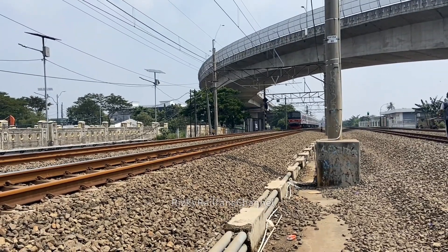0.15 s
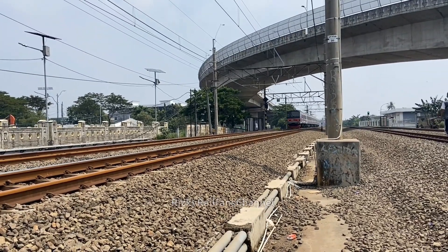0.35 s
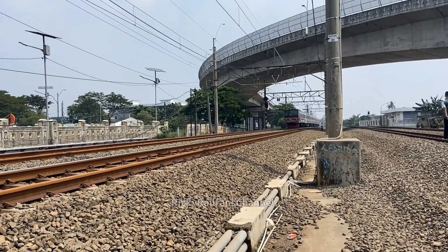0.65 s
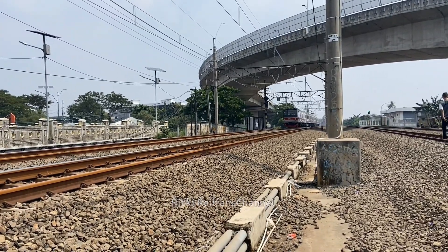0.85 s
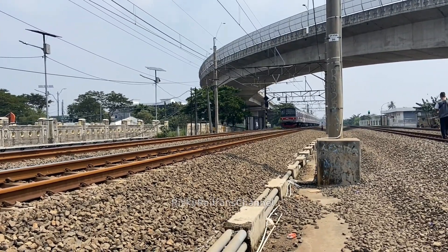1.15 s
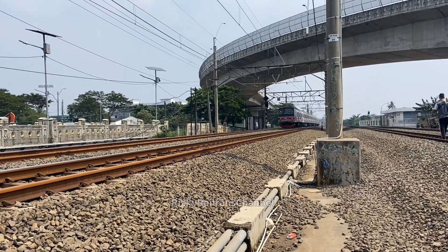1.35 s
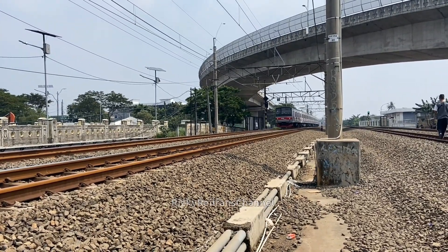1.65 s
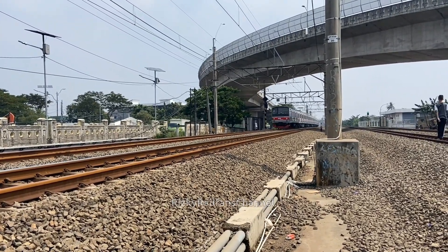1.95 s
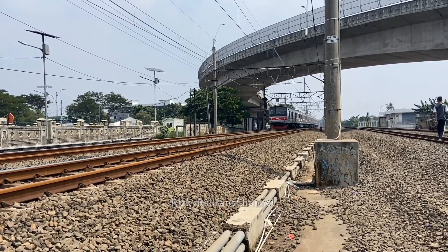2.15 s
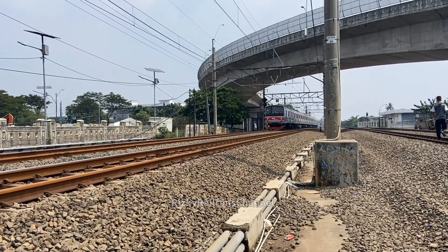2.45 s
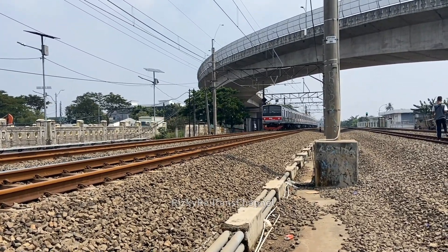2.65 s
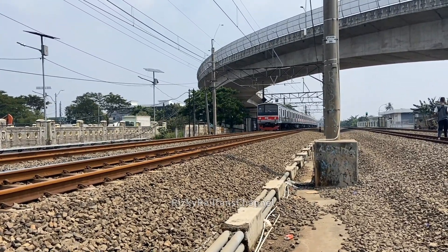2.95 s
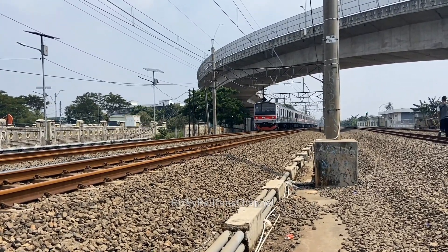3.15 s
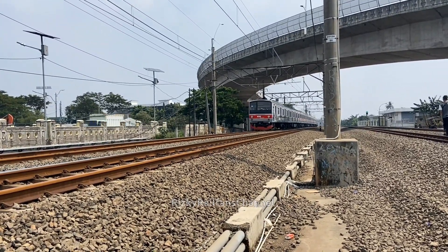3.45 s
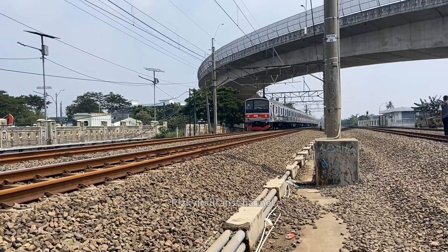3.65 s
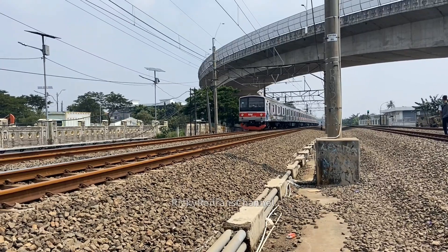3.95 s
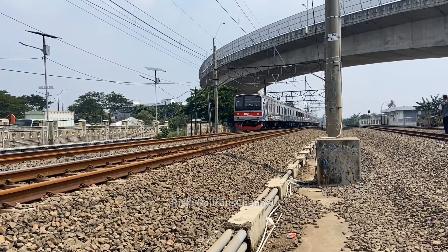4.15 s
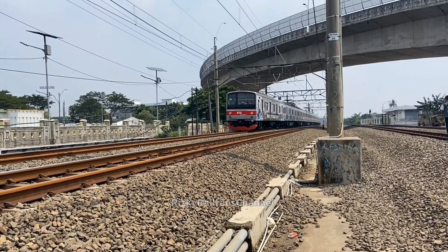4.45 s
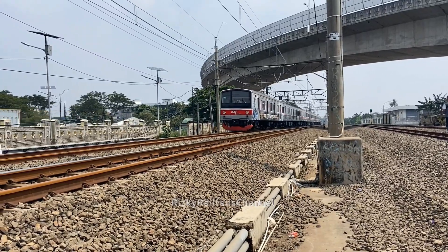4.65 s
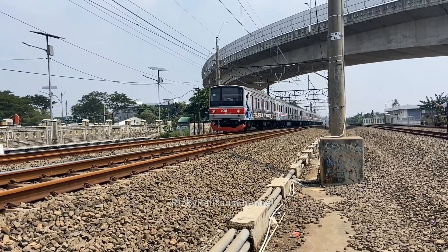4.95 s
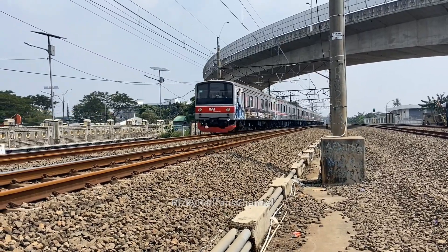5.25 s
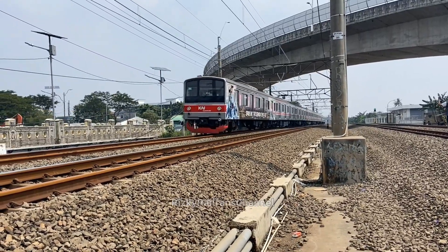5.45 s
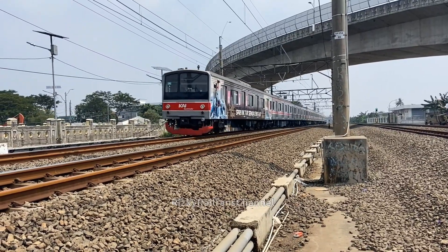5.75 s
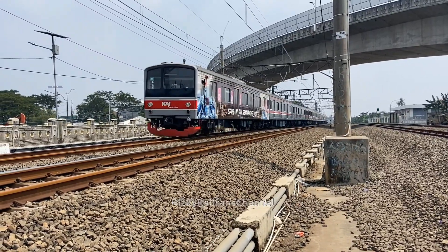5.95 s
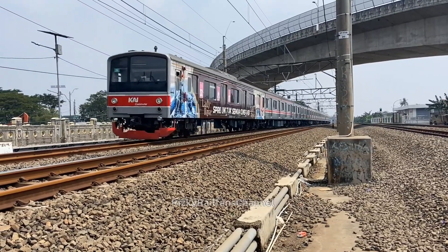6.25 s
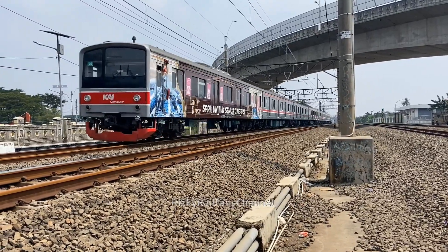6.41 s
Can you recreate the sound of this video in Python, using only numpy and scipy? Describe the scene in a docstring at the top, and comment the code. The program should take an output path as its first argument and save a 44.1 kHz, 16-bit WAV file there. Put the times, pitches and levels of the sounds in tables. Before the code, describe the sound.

Open air by the tracks under a road viaduct, heard on a stereo phone. From 0 s a deep hum around 80 Hz throbs unevenly, with wavering low motor tones, soft ground rumble and dull town noise. Thin tyre noise fades away within the first second, along with tiny high ticks and faint chirps. Light wind brushes the microphones, strongest near 1.8 s, and is mostly gone after 2.5 s. Meanwhile steel rolling slowly rises as an electric train approaches. At about 2.5 s a quick cluster of light metallic clacks rings with a short hiss; another, with a heavy thud, comes at 3.8 s while the wheels sing around it. Clacks follow at 4.4, 4.6, 5.3 and 5.6 s, then crowd together from 5.8 to 6.5 s, with more thuds. A faint mid-pitched drone appears near 5 s. The rolling is loudest at the 6.6 s cut, the train still approaching.

```python
"""An electric train nears a listener on the ballast beside the line, under a road viaduct.
From the start: throbbing hum and motor lines (sines), rumble, town and rolling (shaped noise), wind.
Tyre noise fades in the first second; ticks (decaying sines) and faint tones come mostly early, some later.
Rolling swells and sings in the wheel modes; from 2.5 s wheels hiss, crack and ring over rail joints.
A phone with two microphone ports hears it all."""
import sys
import numpy as np
from scipy import signal
from scipy.fft import rfft, irfft
from scipy.io import wavfile

SR = 44100
rng = np.random.default_rng(int(sys.argv[2]) if len(sys.argv) > 2 else 0)


def output_pcm(signal):
    """Save a mono or channel-first signal as 16-bit PCM at the path in sys.argv[1].

    Samples are clipped to [-1, 1] before scaling.
    """
    pcm = np.clip(np.atleast_2d(signal).T, -1, 1) * 32767
    wavfile.write(sys.argv[1], SR, np.round(pcm).astype(np.int16))


N = 290178
TIME_S = np.arange(N) / SR
FREQ_HZ = np.arange(N // 2 + 1) * SR / N + 1e-3   # offset avoids log(0)

# deep hum: t/s, f/Hz, level/dB
HUM = [(0.0, 78.3, -27), (0.3, 82.2, -28), (0.5, 83.1, -25.5), (0.75, 79.4, -24.5), (1.1, 79.9, -25.5),
       (1.35, 81.3, -30.5), (1.55, 77.4, -27.5), (1.8, 77.5, -29.5), (2.2, 80.27, -26), (2.4, 80.9, -29),
       (2.55, 80.05, -23), (3.3, 79.7, -25.5), (3.65, 80.94, -27.5), (4.0, 79.5, -21.5),
       (4.5, 78.86, -26.5), (4.8, 78.03, -28.5), (5.2, 78.5, -23), (5.5, 77.75, -23), (5.85, 80.2, -24),
       (6.1, 78.7, -21), (6.58, 78.8, -23)]
# brief dips and swells of the hum: centre t/s, half length/s, change/dB
HUM_THROBS = [(0.03, 0.025, -52), (0.11, 0.051, -19), (0.56, 0.064, -23), (0.93, 0.12, -12.5),
              (1.69, 0.1, -30), (2.03, 0.15, -16), (3.45, 0.026, -8), (3.75, 0.061, -4), (3.85, 0.041, -16),
              (3.96, 0.047, 5), (4.01, 0.021, -7), (4.13, 0.028, -7), (4.19, 0.025, -1), (4.3, 0.033, -7),
              (4.35, 0.03, 5), (4.43, 0.028, -5), (4.65, 0.038, -13), (4.73, 0.058, -19),
              (5.22, 0.039, -16), (5.3, 0.052, -27), (5.83, 0.02, -17), (5.96, 0.088, -50),
              (6.31, 0.038, -7), (6.45, 0.064, -35), (6.58, 0.03, -23)]
HUM_WAVER_HZ, HUM_FLUTTER_DB = 0.92, 0.5

# distant motor: t/s, speed/(turns/s), level/dB of the 4th, 5th and 6th multiples
MOTOR = [(0.0, 40.3, -60, -60, -44), (0.4, 40.3, -60, -52, -48), (0.62, 40.2, -60, -52, -46),
         (0.7, 40.0, -60, -36, -38), (0.8, 40.0, -60, -36, -36), (0.87, 40.2, -60, -50, -36),
         (0.95, 40.1, -60, -37, -34), (1.06, 40.1, -60, -38, -35), (1.14, 40.1, -42, -52, -34),
         (1.27, 40.0, -33, -60, -34), (1.45, 40.2, -46, -60, -38), (1.68, 40.4, -36, -50, -48),
         (1.85, 40.6, -50, -60, -46), (2.05, 41.0, -56, -60, -39), (2.25, 41.1, -41, -60, -41),
         (2.45, 41.2, -40, -60, -52), (2.65, 41.4, -42, -60, -54), (2.85, 41.7, -39, -60, -39),
         (3.15, 41.7, -42, -55, -40), (3.35, 41.7, -55, -42, -48), (3.55, 41.8, -60, -41, -42),
         (3.78, 41.9, -60, -39, -50), (3.88, 41.9, -60, -55, -39), (4.0, 41.9, -60, -60, -40),
         (4.1, 42.0, -60, -60, -35), (4.5, 42.0, -60, -55, -39), (4.8, 42.1, -60, -40, -42),
         (4.95, 42.1, -60, -55, -50), (5.22, 42.2, -60, -35, -37), (5.45, 42.4, -60, -46, -37),
         (5.8, 42.0, -60, -44, -43), (5.95, 41.0, -60, -39, -52), (6.3, 40.6, -60, -39, -50),
         (6.47, 40.0, -60, -38, -32), (6.58, 40.0, -60, -40, -33)]

# noise spectra, here and below, are relative: f/Hz, density/(dB per Hz)
# ground rumble from viaduct and track: f/Hz, density/(dB per Hz)
RUMBLE_COLOUR = [(20, -30), (32, -20), (45, 8), (65, 3.5), (100, 2), (150, -10), (250, -15), (400, -35)]
# brief rumble swells and dips: centre t/s, half length/s, change/dB
RUMBLE_SWELLS = [(0.2, 0.52, 7), (0.49, 0.048, 14), (0.72, 0.16, 7), (2.3, 0.61, -2.5), (3.05, 0.17, 8),
                 (3.25, 0.076, 7), (3.82, 0.05, 11.5), (4.19, 0.049, 9), (4.99, 0.11, -6),
                 (5.31, 0.068, 6.5), (5.64, 0.091, -13), (6.14, .08, 5.5), (6.36, 0.058, 4.5)]
RUMBLE_DB, RUMBLE_FOLLOWS, RUMBLE_LUMPS_DB = -29, 0.74, 2   # FOLLOWS: share of approach gain in dB

# town noise with the far roar of the train: f/Hz, density/(dB per Hz)
TOWN_COLOUR = [(40, -12), (90, -3.5), (180, 0.5), (300, -7.5), (410, -7.5), (600, -15), (1000, -16.5),
               (2000, -22.5), (3300, -29), (4300, -32.5), (5500, -34.5), (7000, -49.5), (10000, -48.5),
               (14000, -88), (17000, -68)]
TOWN_DB, TOWN_FOLLOWS = -30, 0.44

# tyre noise: t/s, level/dB
TYRES = [(0, -40), (0.15, -45), (0.3, -44.5), (0.45, -45), (0.55, -57), (0.7, -69), (1.2, -80)]
# tyre spectrum: f/Hz, density/(dB per Hz)
TYRE_COLOUR = [(600, -19), (900, 4.5), (1500, -0.5), (2000, -7), (2200, -5), (2360, 0.5), (2520, -3),
               (2750, -2), (2950, 0.5), (3200, -1.5), (3600, -10), (4300, -6), (4800, -13), (6000, -19),
               (9000, -28)]

# rolling steel on steel: f/Hz, density/(dB per Hz)
ROLLING_COLOUR = [(150, -35), (300, 4), (450, 2.5), (700, -5.5), (1100, -24.5), (2000, -21), (3500, -28.5),
                  (5500, -24.5), (8000, -26.5), (11000, -33), (17000, -39.5)]
# wheel resonances: f/Hz, width/Hz, gain/dB before song gain, singing and swell
WHEEL_MODES = [(917, 89, 9), (1560, 68, 15), (2062, 40, 12.5), (2192, 80, 12), (2394, 120, 2),
               (2842, 55, 13), (2932, 70, 13.5), (3545, 50, 9), (3750, 130, 8), (4150, 90, 2),
               (4755, 90, 4.5)]
# modes within 6 % of f briefly swell or dip: f/Hz, centre t/s, half length/s, change/dB
SINGING = [(1570, 2.7, 0.41, 7), (1570, 3.864, 0.88, 9.5), (1570, 5.21, 0.31, 6), (1570, 6.03, .06, 5),
           (1570, 6.25, 0.068, 8.5), (1570, 6.47, 0.071, 5.5), (2174, 3.73, 0.2, 6), (2162, 5.3, 0.28, 8),
           (2215, 5.97, .08, 2), (2250, 6.45, 0.098, 3), (2200, 5.72, 0.1, -1), (2900, 5.95, 0.21, 2.5),
           (2900, 6.8, 0.069, 2), (2900, 6.5, 0.046, -4), (3700, 6.3, .35, 1.5)]
START_M, SPEED_M_PER_S, REFERENCE_M = 114, 15, 30
ROLLING_DB, SPREAD_DB_PER_DECADE = -37.5, 17   # rolling level at REFERENCE_M
SONG_DB, SONG_FOLLOWS, SONG_SWELL_DB = 2.5, 0.25, 2.5

# wind on the ports: t/s, level/dB of the part in opposition
WIND = [(0, -49), (0.6, -45), (0.9, -49.5), (1.68, -44), (1.78, -38.5), (1.9, -42.5), (2.15, -44),
        (2.5, -51), (6.58, -75)]
# wind spectrum: f/Hz, density/(dB per Hz)
WIND_COLOUR = [(250, -9), (400, -6.5), (520, -1.5), (700, -0.5), (900, -6), (1500, -23)]

# tyre tones, chirps, low motor tones, a drone: start t/s, end t/s, first f/Hz, last f/Hz,
# level/dB, left minus right/dB
FAINT_TONES = [(0.035, 0.085, 2930, 2950, -53, 0), (0.15, 0.25, 2330, 2370, -55, 0),
               (0.275, 0.31, 4280, 4240, -57, 0), (0.345, 0.38, 4150, 4270, -63, -2),
               (0.395, 0.41, 4080, 4110, -58, 0), (0.422, 0.438, 4070, 4080, -57, -1),
               (0.46, 0.5, 4200, 4290, -59, 0), (0.58, 0.66, 855, 870, -52, 0),
               (0.61, 0.71, 785, 780, -52, 0), (0.73, 0.82, 121, 122, -33, 0),
               (0.79, 0.99, 822, 812, -50, 4), (0.91, 1.05, 119, 119, -35, 0), (1.4, 1.5, 188, 186, -36, 0),
               (3.1, 3.4, 168, 176, -38, 6), (4.93, 5.29, 745, 737, -44, -2),
               (5.15, 6.583, 46.92, 46.92, -38, 3), (5.402, 5.9, 385, 385, -48, -4)]
TONE_FADE_SHARE = 0.25   # of its length, centred on start and end

# tiny high ticks: t/s, peak/dB before envelope, f/Hz
TICKS = [(0.180, -47, 14000), (0.259, -54, 14600), (0.269, -45, 14100), (0.380, -48, 14100),
         (0.412, -51, 14100), (0.422, -48, 14000), (0.431, -48, 14200), (3.475, -48, 11800)]
TICK_T60_S = 0.014

# wheels over rail joints: t/s, hiss/dB, ring/dB, hardness/(dB per octave re 1 kHz), thud/dB,
# favoured mode f/Hz, hiss t60/s; levels before envelopes, ring also before mode offsets
JOINTS = [(2.544, -60, -39, -4, -40, 845, .1), (2.553, -44, -32, 0, -36, 1590, 0.24),
          (2.606, -46, -33, -5, -40, 985, .1), (3.773, -45.5, -36, -2, -30, 1590, 0.45),
          (3.784, -55, -37, 0, -40, 985, .1), (3.797, -60, -38, -2, -9, 1460, .1),
          (4.35, -44, -40, 4, -14, 845, 0.14), (4.575, -43, -40, -6, -38, 651, 0.11),
          (5.27, -53, -47, -2, -24, 400, 0.12), (5.56, -43, -50, -4, -34, 400, 0.16),
          (5.795, -40, -41, -4, -12, 985, .15), (6.034, -57, -42, 0, -34, 1590, .12),
          (6.238, -50, -42, 2, -33, 1590, 0.11), (6.33, -39, -48, -4, -16, 2940, 0.24),
          (6.395, -50, -42, 2, -36, 2120, .1), (6.505, -45, -44, 4, -11, 2120, 0.2)]
# hiss spectrum at a joint: f/Hz, density/(dB per Hz)
CLACK_COLOUR = [(300, -14), (1000, -7), (1600, -23), (3000, -7), (5500, -10), (8200, -9.5), (11000, -19.5),
                (14000, -24), (17000, -50)]
# rail modes: f/Hz, offset/dB, t60/s
RAIL_MODES = [(400, 0, 0.12), (651, -5, 0.1), (845, -4, 0.07), (985, -2, 0.09), (1460, -4, .07),
              (1590, -3, 0.06), (2120, -3, 0.05), (2940, -3, .045)]
# dry crack spectrum: f/Hz, density/(dB per Hz)
CRACK_COLOUR = [(200, -10), (500, 0), (1600, -3), (3200, -9), (5000, -24)]
CLACK_RISE_S = 0.016
THUD_HZ, THUD_T60_S = 95, 0.04
CRACK_DB, CRACK_T60_S = -4, 0.07   # CRACK_DB: re ring
BLOW_RISE_S, BLOW_SPREAD_S = 0.006, 0.006   # SPREAD: full range of mode starts
FAVOUR_DB, BLOW_CHANCE_DB = 8, 2

# the two ports: f/Hz, power share common to both, right lead/rad, left minus right/dB
PORTS = [(0, .95, 0, -1.2), (260, .85, -.1, -1), (520, .55, -.5, .3), (780, .25, -.5, 1.7),
         (1040, .3, -2.3, 1.3), (1300, .05, -1.5, .2), (1560, .45, -.7, 0), (1820, .5, -3.3, -1.3),
         (2080, .75, -5, -.3), (2340, .65, -6.25, -1.4), (2600, .35, -6.95, 0), (2950, .72, -6.9, 0),
         (3400, .2, -8.2, .7), (3640, .42, -5.9, 0), (4420, .53, -6.1, -.3), (4940, .43, -7.2, -.5),
         (5460, .33, -9.7, 0), (5850, .2, -12, -1.2), (6500, .65, -12.9, 1.5), (7500, .7, -12, .3),
         (8200, .8, -10.6, .5), (8700, 1, -9.425, 0), (9600, 1, -9.425, 0), (10500, .95, -6.3, 0),
         (11700, .95, -6.2, 0), (12600, 1, -3.1416, 0), (13700, 1, -3.1416, 0), (14900, 1, 0, 0)]
LOW_CUT_HZ, STOPBAND_EDGE_HZ = 39, 16050


def from_db(db):
    """Decibels to gain."""
    return 10 ** (np.asarray(db) / 20)


def rms_one(x):
    """Scale to unit rms."""
    return x / np.sqrt(np.mean(x ** 2) + 1e-20)


def in_time(rows):
    """Each table column as a curve over all samples."""
    t_s, *columns = np.transpose(rows)
    return [np.interp(TIME_S, t_s, column) for column in columns]


def drift(corner_hz):
    """Slow chance of unit rms: noise at SR/40 through two equal one-pole low-passes."""
    step = 40
    pole = np.exp(-2 * np.pi * corner_hz * step / SR)
    noise = rng.standard_normal(N // step + 2002)
    slow = signal.lfilter([1], [1, -2 * pole, pole ** 2], noise)[2000:]   # drop the settling
    return np.interp(np.arange(N) / step, np.arange(len(slow)), rms_one(slow))


def swells(rows):
    """Sum of cosine-squared bumps in dB: centre t/s, half length/s, change/dB."""
    total_db = 0
    for t_s, half_s, change_db in rows:
        phase = np.pi / 2 * np.clip((TIME_S - t_s) / half_s, -1, 1)
        total_db = total_db + change_db * np.cos(phase) ** 2
    return total_db


def colour(points):
    """Spectral gain, interpolated over log f; -120 dB outside the table."""
    hz, db = np.transpose(points)
    return from_db(np.interp(np.log(FREQ_HZ), np.log(hz), db, left=-120, right=-120))


def field(gain):
    """Three independent noises of one colour: common to both ports, left only, right only."""
    spectra = rfft(rng.standard_normal((3, N)))
    return rms_one(irfft(spectra * gain, N))


def tone(hz, level_db, waver_hz, flutter_db):
    """A sine of given rms level whose pitch and strength wander."""
    turns = np.cumsum(hz + waver_hz * drift(3.19)) / SR + rng.random()
    gain = np.sqrt(2) * from_db(level_db + flutter_db * drift(6.1))
    return gain * np.sin(2 * np.pi * turns)


def add(out, start_s, t60_s, shape, rise_s=0.0013):
    """Add shape(age/s) in place, with linear rise and exponential decay."""
    first = round(start_s * SR)
    age_s = np.arange(min(int(1.2 * t60_s * SR), N - first)) / SR
    envelope = np.minimum(age_s / rise_s, 1) * from_db(-60 * age_s / t60_s)
    out[first:first + len(age_s)] += envelope * shape(age_s)


def struck(hz, peak_db):
    """A sine starting at zero phase at the blow."""
    return lambda age_s: from_db(peak_db) * np.sin(2 * np.pi * hz * age_s)


def nearness_db():
    """Level re reference distance as the train closes in at steady speed."""
    distance_m = START_M - SPEED_M_PER_S * TIME_S
    return -SPREAD_DB_PER_DECADE * np.log10(distance_m / REFERENCE_M)


def hum():
    """A wavering sine throbs through dips and swells."""
    hz, level_db = in_time(HUM)
    return tone(hz, level_db + swells(HUM_THROBS), HUM_WAVER_HZ, HUM_FLUTTER_DB)


def motor():
    """Sines at three multiples of the turning speed."""
    out = np.zeros(N)
    turns_per_s, *levels_db = in_time(MOTOR)
    for multiple, level_db in zip((4, 5, 6), levels_db):
        out += tone(multiple * turns_per_s, level_db, waver_hz=0.4, flutter_db=1.0)
    return out


def rumble():
    """Low noise from viaduct and track partly follows the approach, in lumps."""
    level_db = RUMBLE_DB + RUMBLE_FOLLOWS * nearness_db()
    level_db += swells(RUMBLE_SWELLS) + RUMBLE_LUMPS_DB * drift(4.5)
    return from_db(level_db) * field(colour(RUMBLE_COLOUR))


def town():
    """Town noise, with the far roar of the train growing inside it."""
    level_db = TOWN_DB + TOWN_FOLLOWS * nearness_db() + 1.1 * drift(7.9)
    return from_db(level_db) * field(colour(TOWN_COLOUR))


def tyres():
    """Tyre noise: shaped noise under a falling level."""
    level_db = in_time(TYRES)[0] + 1.5 * drift(9.5)
    return from_db(level_db) * field(colour(TYRE_COLOUR))


def wheel_modes(noise, song_db):
    """Rolling noise drives two-pole wheel resonances, each swelling on its own."""
    out = noise.copy()
    for hz, width_hz, gain_db in WHEEL_MODES:
        radius = np.exp(-np.pi * width_hz / SR)
        poles = [1, -2 * radius * np.cos(2 * np.pi * hz / SR), radius ** 2]
        edge = (1 - radius ** 2) / 2
        rung = signal.lfilter([edge, 0, -edge], poles, noise)
        singing_db = swells([row for pitch_hz, *row in SINGING if abs(hz / pitch_hz - 1) < 0.06])
        out += from_db(gain_db + song_db + singing_db + SONG_SWELL_DB * drift(8.6)) * rung
    return out


def rolling():
    """Rough steel on steel excites the wheels and grows as the train nears."""
    song_db = SONG_DB + SONG_FOLLOWS * nearness_db()
    noise = wheel_modes(field(colour(ROLLING_COLOUR)), song_db)
    return from_db(ROLLING_DB + nearness_db() + 0.41 * drift(6.5)) * noise


def wind():
    """Air across the phone presses on one port as it pulls on the other."""
    across, left, right = field(colour(WIND_COLOUR))
    pair = across * np.array([[1], [-1]]) + 1.1 * np.array([left, right])
    return from_db(in_time(WIND)[0] + 1.2 * drift(8.1)) * pair


def faint_tones():
    """Sines, steady or gliding, each with its own left-right balance: tyres, chirps, motor, drone."""
    out = np.zeros((2, N))
    for start_s, end_s, first_hz, last_hz, level_db, pan_db in FAINT_TONES:
        along = (TIME_S - start_s) / (end_s - start_s)
        sounding = np.clip(0.5 + np.minimum(along, 1 - along) / TONE_FADE_SHARE, 0, 1)
        hz = first_hz + (last_hz - first_hz) * along
        faint = sounding * tone(hz, level_db, waver_hz=1.5, flutter_db=1.8)
        out += from_db([[pan_db / 2], [-pan_db / 2]]) * faint
    return out


def ticks():
    """Tiny high decaying sines."""
    out = np.zeros(N)
    for t_s, peak_db, hz in TICKS:
        add(out, t_s, TICK_T60_S, struck(hz, peak_db))
    return out


def joint_hiss():
    """Steel-on-steel noise flares up at each joint and dies away."""
    flare = np.zeros(N)
    for t_s, hiss_db, *_, t60_s in JOINTS:
        add(flare, t_s, t60_s, lambda age_s: from_db(hiss_db), CLACK_RISE_S)
    return flare * field(colour(CLACK_COLOUR))


def joint_blows():
    """Each joint thuds the ground, cracks and rings the rail; harder blows favour higher modes."""
    out, crack = np.zeros(N), np.zeros(N)
    chance = rng.uniform(-1, 1, (len(JOINTS), len(RAIL_MODES), 2))
    for joint, luck in zip(JOINTS, chance):
        t_s, _, ring_db, hardness_db, thud_db, favoured_hz, _ = joint
        add(out, t_s, THUD_T60_S, struck(THUD_HZ, thud_db))
        add(crack, t_s, CRACK_T60_S, lambda age_s: from_db(ring_db + CRACK_DB), BLOW_RISE_S)
        for (hz, offset_db, t60_s), (stronger, later) in zip(RAIL_MODES, luck):
            peak_db = ring_db + offset_db + BLOW_CHANCE_DB * stronger
            peak_db += hardness_db * np.log2(hz / 1000)
            peak_db += FAVOUR_DB * (abs(hz / favoured_hz - 1) < 0.06)
            start_s = t_s + BLOW_SPREAD_S * later / 2
            add(out, start_s, t60_s, struck(hz, peak_db), BLOW_RISE_S)
    return out + crack * rms_one(field(colour(CRACK_COLOUR))[0])


def ports(diffuse, direct):
    """Mix common and own parts by frequency; the ports differ in phase and level by frequency."""
    hz, share, lead_rad, tilt_db = np.transpose(PORTS)
    share = np.clip(np.interp(FREQ_HZ, hz, share), 0, 1)
    common, left, right = rfft(diffuse)
    common = np.sqrt(share) * common + rfft(direct)
    turn = np.exp(1j * np.interp(FREQ_HZ, hz, lead_rad))
    own = np.sqrt(1 - share) * np.array([left, right])
    pair = np.array([common, common * turn]) + own
    tilt = from_db(np.interp(FREQ_HZ, hz, tilt_db) / 2)
    return irfft(pair * [tilt, 1 / tilt], N)


def scene():
    """All sources at the two ports."""
    direct = hum() + motor() + ticks() + joint_blows()
    diffuse = rumble() + town() + tyres() + rolling() + joint_hiss()
    return ports(diffuse, direct) + wind() + faint_tones()


def record(dry):
    """The microphones lose the deepest bass; the top is cut steeply."""
    low_cut = signal.butter(2, LOW_CUT_HZ, "high", fs=SR, output="sos")
    top_cut = signal.cheby2(16, 70, STOPBAND_EDGE_HZ, fs=SR, output="sos")
    return signal.sosfilt(top_cut, signal.sosfilt(low_cut, dry))


dry = scene()
out = record(dry)
output_pcm(out)
```